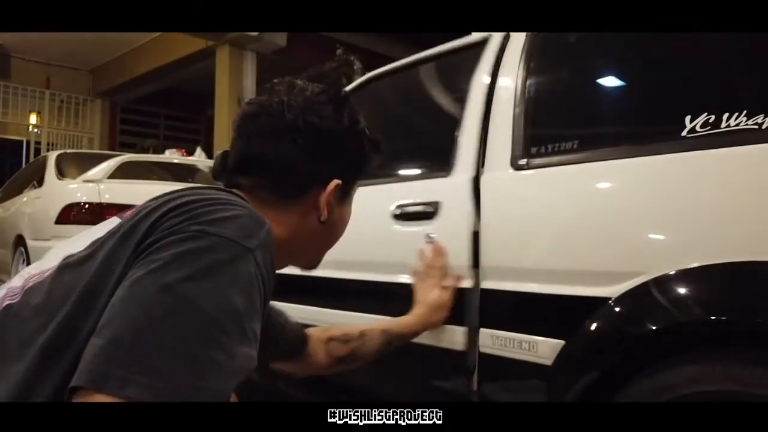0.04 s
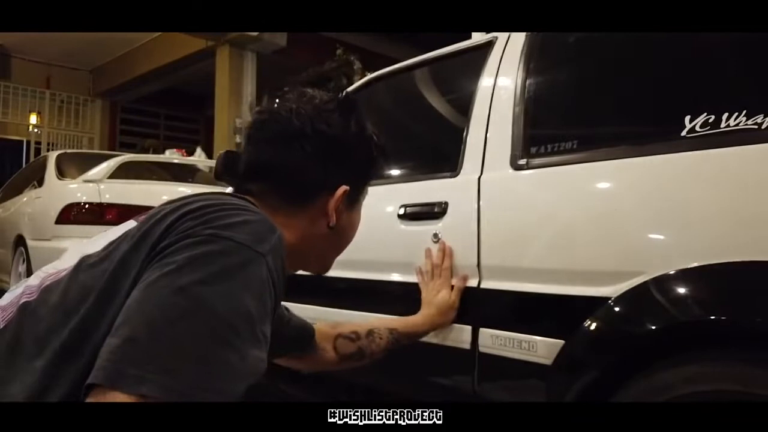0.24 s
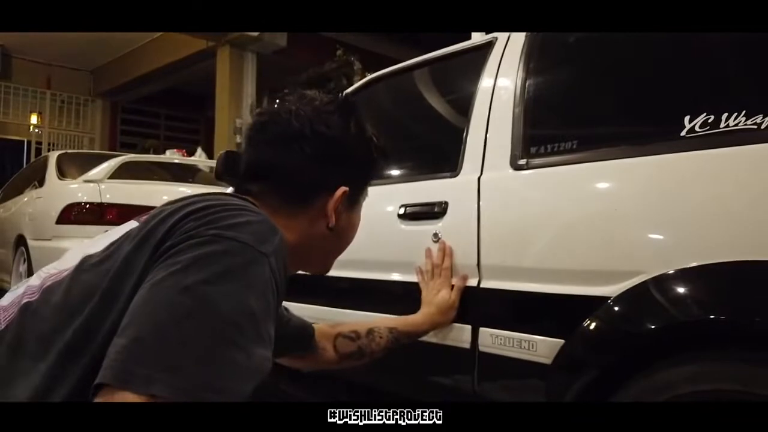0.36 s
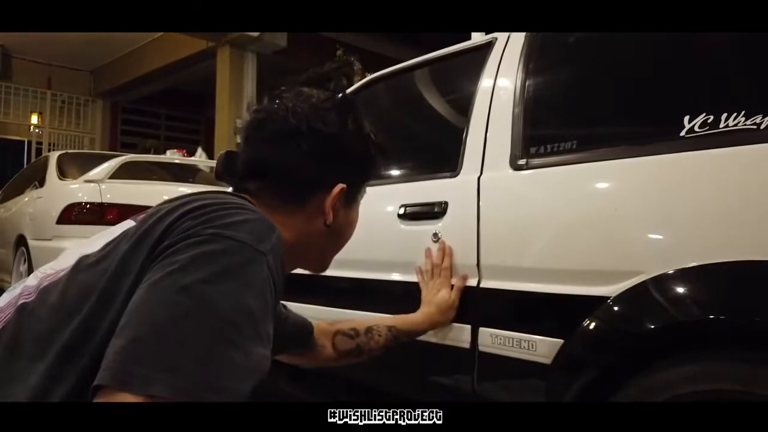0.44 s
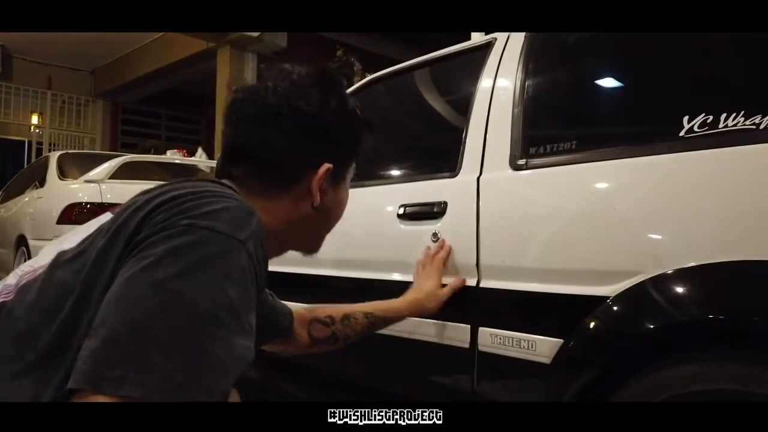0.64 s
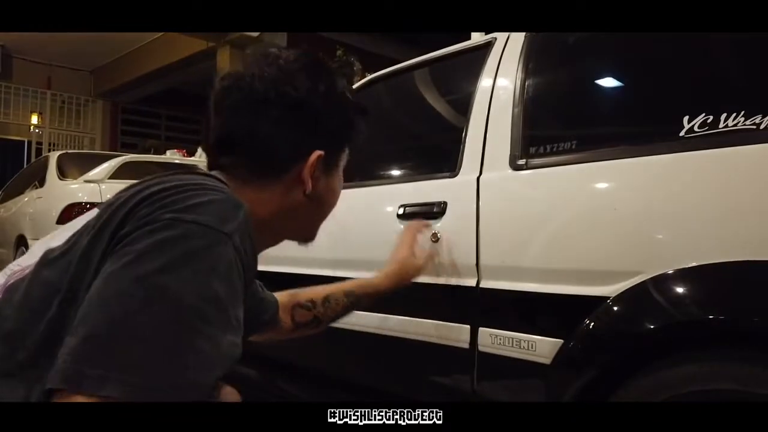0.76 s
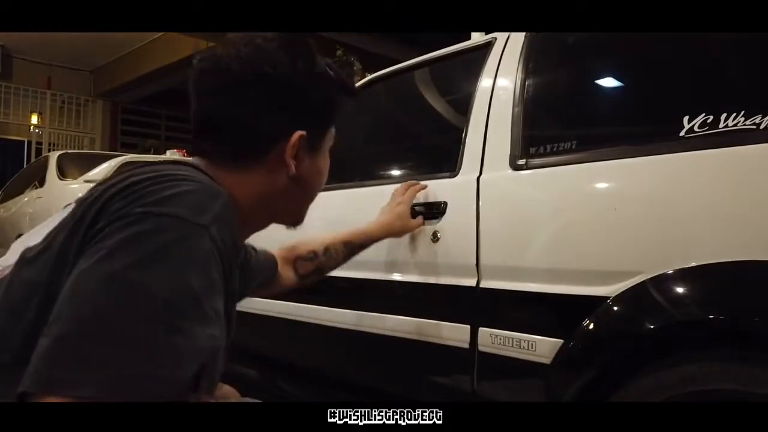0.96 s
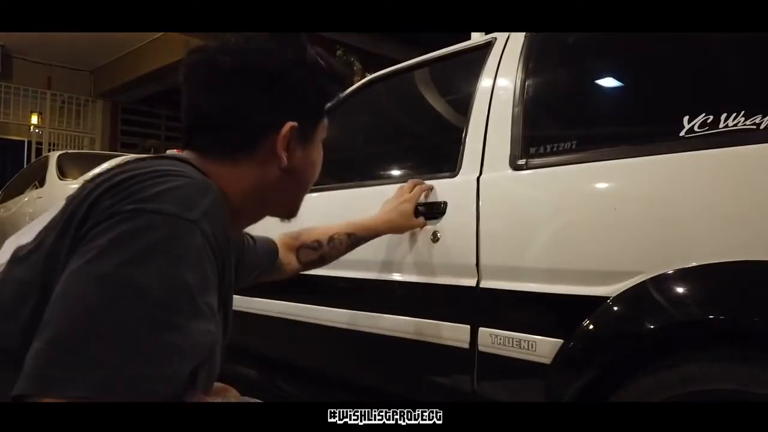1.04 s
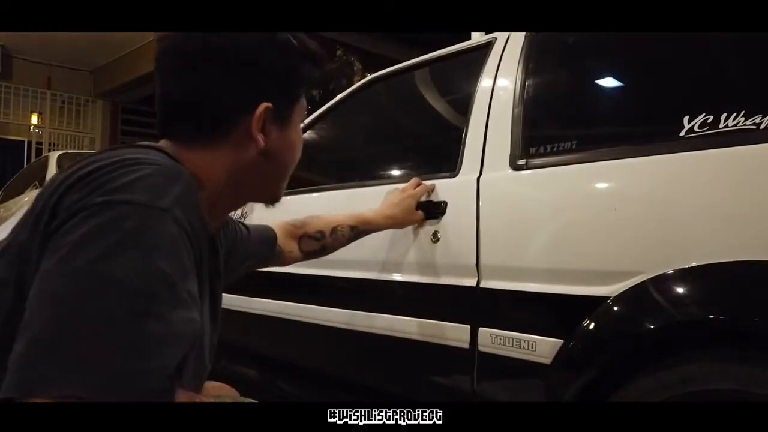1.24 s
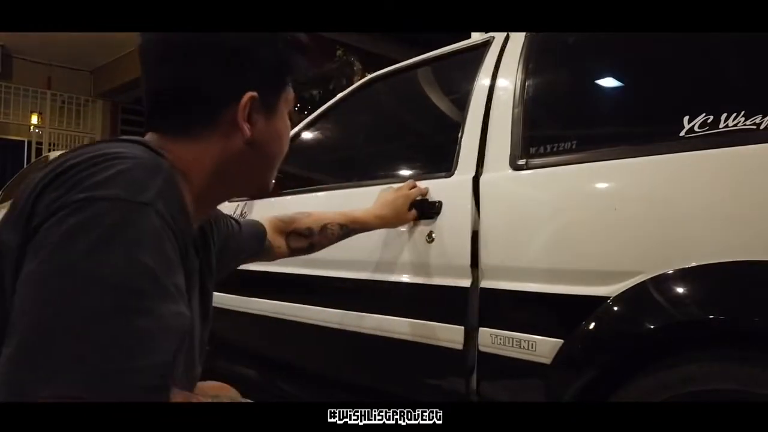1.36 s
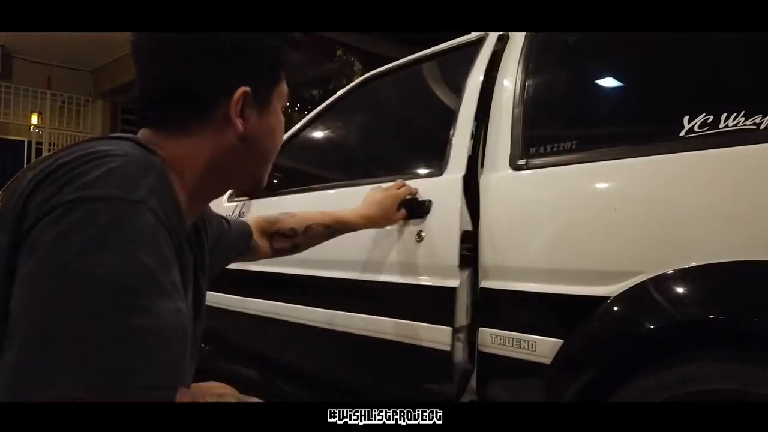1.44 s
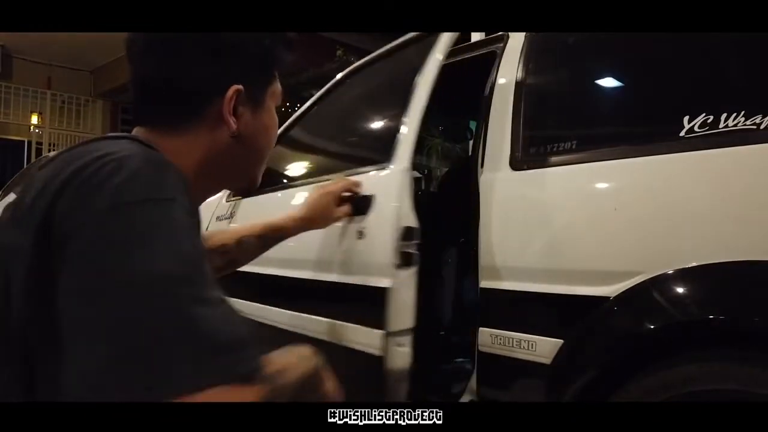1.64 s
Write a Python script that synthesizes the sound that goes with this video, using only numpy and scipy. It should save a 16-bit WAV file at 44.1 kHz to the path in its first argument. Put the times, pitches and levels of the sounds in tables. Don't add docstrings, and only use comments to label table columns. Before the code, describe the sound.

Close phone pickup of a vehicle door banging shut, boomy and metallic, with a quick wall echo, faint hand rubs and panel taps, then a crisp multi-click latch opening over quiet insects and traffic rumble.

```python
import sys
import numpy as np
from scipy import signal
from scipy.fft import rfft, irfft, next_fast_len
from scipy.io import wavfile

SR = 44100
rng = np.random.default_rng(int(sys.argv[2]) if len(sys.argv) > 2 else 0)


def unload_wav(signal):
    wavfile.write(
        sys.argv[1],
        SR,
        np.round(np.clip(np.atleast_2d(signal).T, -1, 1) * 32767).astype(np.int16),
    )


def magnitude_from_level(level_db):
    exponent = np.asarray(level_db, float) / 20
    return 10 ** exponent


N = 74970


def on_log(table, hz):
    a = np.array(table, float)
    return np.interp(np.log(np.maximum(hz, 1)), np.log(a[:, 0]), a[:, 1])


def unit(x):
    return x / np.sqrt(np.mean(x ** 2))


def shape(x, gain):
    n = next_fast_len(N + 4096)
    return irfft(rfft(x, n) * gain(np.arange(n // 2 + 1) * SR / n), n)[..., :N]


def bell(hz, width_hz):
    return lambda f: np.exp(-((f - hz) / width_hz) ** 2)


def swell(at, rise, t60):
    u = np.maximum(np.arange(N) / SR - at, 0)
    attack = np.sin(np.minimum(u / rise, 1) * np.pi / 2) ** 2
    return attack * np.exp(-np.log(1000) * np.maximum(u - rise, 0) / t60)


def walk(rate):
    return unit(shape(rng.standard_normal(N), bell(0, rate)))


def spread(x, direct=0, narrow_db=-2.0):
    # (frequency [Hz], level [dB])
    side_width = [(60, -51), (110, -55), (200, -21), (380, -12.5), (700, -5.5), (1290, -2), (2380, 6),
                  (4400, 3.5), (8120, 7.5), (15000, 7.5)]
    scatter = rng.standard_normal(N) * swell(0, 0.00069, 0.06)
    scatter = scatter / np.linalg.norm(scatter)
    wide = x - (1 - magnitude_from_level(narrow_db)) * direct
    side = signal.fftconvolve(wide, scatter)[:N] * walk(120) * 0.34
    side = shape(side, lambda f: magnitude_from_level(on_log(side_width, f)) * np.minimum(f / 300, 1) ** 3)
    bass_sway = shape(x, bell(0, 120)) * magnitude_from_level(-31.5) * walk(33)
    side = side + shape(bass_sway, bell(0, 200))
    return np.array([x + side, x - side])


def clatter(bursts, colour, scatter_db=1.5, ring_db=-8.0, count=45):
    panel_hz = [640, 641, 733, 740, 852, 946, 1097, 1320, 1392, 1755, 2100, 2614]
    treble_hz = 4100
    uneven = magnitude_from_level(scatter_db * rng.exponential(size=N)) * magnitude_from_level(0.5 * walk(190))
    hits = unit(rng.standard_normal(N) * uneven)
    body = hits * sum(magnitude_from_level(db) * swell(at, rise, t60) for at, db, rise, t60, _ in bursts)
    edge = hits * sum(magnitude_from_level(db + treble_db) * swell(at, rise, t60) for at, db, rise, t60, treble_db in bursts)
    hits = edge + shape(body - edge, bell(0, treble_hz))

    def damp(f):
        return 50 + f / 23.0

    def gain(f):
        low_end = np.minimum(f / colour[0][0], 1) ** 2
        high_end = np.minimum(colour[-1][0] / (f + 1), 1) ** 10
        return magnitude_from_level(on_log(colour, f)) * low_end * high_end

    u = np.arange(SR // 20) / SR
    modes_hz = np.r_[panel_hz, 1500 * 8. ** rng.random(count)]
    ring = sum(np.sin(2 * np.pi * f * u) * np.exp(-u * damp(f)) * np.sqrt(damp(f)) for f in modes_hz)
    ring = magnitude_from_level(ring_db) * ring / np.linalg.norm(ring) + (u == 0)
    loudness = np.sqrt(np.mean(gain(np.arange(SR // 2)) ** 2))
    return shape(signal.fftconvolve(hits, ring)[:N], gain) / loudness


def night():
    # (frequency [Hz], level [dB per Hz])
    traffic_colour = [(20, 8.5), (60, -2.5), (150, -9), (440, -23), (1500, -29), (5500, -38.5),
                      (11000, -62), (12800, -70)]
    # (pitch [Hz], width [Hz], level [dB])
    insects = [
        (3615, 31, -64.5),
        (4450, 910, -52.5),
        (9090, 1560, -56.5),
        (9500, 4600, -63),
    ]
    traffic_db = -43.5
    traffic, surge = 0, walk(2.4)
    for hz in 25 * 2 ** np.arange(0, 9.1, .5):
        sway_db = 0.8 * surge + 1.5 * walk(6)
        traffic = traffic + shape(rng.standard_normal(N), bell(hz, hz / 4)) * magnitude_from_level(sway_db)
    traffic = shape(traffic, lambda f: magnitude_from_level(on_log(traffic_colour, f)))
    bugs = 0
    for hz, width_hz, db in insects:
        choir = unit(shape(rng.standard_normal((2, N)), bell(hz, width_hz / 2)))
        bugs = bugs + choir * magnitude_from_level(db + 1.05 * walk(25))
    bugs = 0.44 * bugs[0] + 0.43 * bugs[1] * np.array([[1], [-1]])
    return spread(unit(traffic) * magnitude_from_level(traffic_db)) + bugs


def distant_tail():
    # (time [s], level [dB], rise [s], t60 [s], extra treble [dB])
    returns = [
        (.6000, -61.5, 0.043, 0.99, 0),
        (.7400, -64, .012, 0.26, 5),
        (.8360, -74, .001, 0.11, -5),
    ]
    # (frequency [Hz], level [dB per Hz])
    colour = [(1300, -23), (1800, 3.5), (2150, 6), (2600, -18), (3300, -18)]
    return clatter(returns, colour, scatter_db=-1.0, ring_db=-16.0)


def wall_echo():
    # (time [s], level [dB], rise [s], t60 [s], extra treble [dB])
    echoes = [
        (.4985, -41.5, 0.0017, 0.27, 1.5),
        (.5120, -47.5, 0.015, 0.2, -1.5),
        (.5800, -60.5, 0.019, 0.55, -0.5),
    ]
    # (frequency [Hz], level [dB per Hz])
    colour = [(500, -6), (1500, -2.5), (2200, 3), (3300, 2), (4500, -11.5), (7000, -10), (11000, -15),
              (15000, -22)]
    return clatter(echoes, colour, scatter_db=-0.5, ring_db=-22.0)


def carport(x):
    # (frequency [Hz], t60 [s])
    decay = [(60, 0.94), (300, 0.8), (1500, 0.48), (5000, 0.87), (10000, 0.57), (15000, 0.29)]
    port_db = -16
    tail = 0
    for hz in 30 * 2. ** np.arange(10):
        octave = shape(rng.standard_normal(N), bell(hz, hz / 2))
        tail = tail + octave * swell(0, 0.0098, on_log(decay, hz))
    return signal.fftconvolve(x, magnitude_from_level(port_db) * tail / np.linalg.norm(tail))[:N]


def grip():
    # (time [s], level [dB], rise [s], t60 [s], extra treble [dB])
    rubs = [
        (.1050, -61.5, 0.0098, 0.21, -8),
        (.4900, -49.5, .03, .5, -6),
        (.7250, -53.5, 0.013, 0.27, -3),
        (1.1700, -61, 0.015, 0.079, 4),
        (1.3300, -53, 0.026, 0.48, -7),
        (1.3900, -53, 0.033, 0.14, -5),
    ]
    # (frequency [Hz], level [dB per Hz])
    colour = [(150, -2), (300, -11.5), (600, -29), (2000, -25.5)]
    return clatter(rubs, colour)


def finger_taps():
    # (time [s], level [dB], rise [s], t60 [s], extra treble [dB])
    taps = [
        (.0960, -64.5, 0.022, 0.06, -9),
        (.7270, -48.5, 0.0015, 0.064, -5),
        (.8362, -52, .0004, 0.047, 1),
        (.8480, -61, 0.0086, 0.17, 6),
    ]
    # (frequency [Hz], level [dB per Hz])
    colour = [(500, -11), (800, 7), (1500, -1.5), (2600, -0.5), (3500, -15), (6000, -40)]
    return clatter(taps, colour)


def latch_opening():
    # (time [s], level [dB], rise [s], t60 [s], extra treble [dB])
    clicks = [(1.3420, -58, 0.003, 0.1, -3), (1.3745, -58, 0.002, 0.088, -6),
              (1.4190, -48, 0.021, 0.27, -1.5), (1.4430, -38, 0.0015, 0.16, -1),
              (1.4515, -33.5, 0.0013, 0.034, 11.5), (1.4725, -27.5, 0.0015, 0.027, -0.5),
              (1.4800, -37.5, 0.011, 0.25, -7), (1.4645, -41, .0008, 0.022, 0.5),
              (1.4875, -39, .0006, 0.013, -2), (1.5015, -35.5, 0.00093, 0.026, 3.5),
              (1.5200, -48.5, 0.0082, 0.16, 1), (1.5790, -51, 0.0024, 0.049, -22),
              (1.6700, -68, 0.0091, 0.34, 3)]
    # (frequency [Hz], level [dB per Hz])
    colour = [(300, -8.5), (560, -8), (900, -1.5), (2500, -1.5), (4200, -9), (8000, -12), (11000, -12.5),
              (15000, -26.5)]
    return clatter(clicks, colour, scatter_db=1.0)


def metal_pings():
    # (time [s], pitch [Hz], level [dB], rise [s], t60 [s])
    tones = [(0.087, 1590, -48.5, 0.021, 0.085), (0.21, 790, -21, 0.0029, 0.066),
             (0.215, 945, -23, 0.0016, 0.059), (0.22, 1440, -21, 0.0024, 0.056),
             (.2890, 7070, -21.5, 0.00067, .015), (0.1, 570, -59, .015, 0.18),
             (0.21, 630, -32, 0.0036, .035), (.2250, 1250, -22.5, 0.0025, .03),
             (0.23, 2150, -26, 0.0065, .05), (0.28, 600, -18, .003, 0.061), (0.28, 2050, -28, 0.0049, .06),
             (.3150, 237, -27, 0.0224, 0.162), (.3050, 323, -28.5, 0.014, 0.18),
             (.3500, 598, -41, .02, 0.2), (0.37, 178, -34.5, 0.023, 0.44), (.4700, 192, -49, 0.025, .4),
             (0.74, 616, -47, 0.0028, 0.053), (0.728, 930, -49, 0.0024, 0.077),
             (0.837, 694, -54.5, 0.0019, 0.2), (0.850, 950, -48, .01, 0.09), (.8365, 840, -50, .001, .05),
             (1.27, 1760, -56.5, 0.012, 0.15), (1.342, 1350, -54.5, .004, 0.033),
             (1.346, 1780, -54, 0.0048, .04), (1.338, 1530, -51, 0.0064, 0.027),
             (1.415, 665, -46, 0.003, 0.056), (1.4510, 900, -26, 0.0042, 0.029),
             (1.441, 420, -38.5, 0.022, 0.17), (1.5015, 1320, -38, 0.00091, .03),
             (1.455, 1800, -38, .003, .05), (1.4730, 950, -25, 0.00062, 0.026),
             (1.481, 2100, -35, .0015, 0.018), (1.451, 2600, -30.5, 0.0017, 0.099),
             (1.454, 10560, -29.5, 0.0014, 0.014), (.2480, 280, -32, .006, 0.11),
             (.3800, 100, -30, 0.011, .15), (0.584, 84, -46, 0.073, 1.7), (0.76, 1750, -55, .001, .08),
             (0.77, 2800, -61, 0.0091, .05), (1.3745, 3300, -56, .003, .035),
             (1.4760, 680, -35, 0.0033, 0.072), (1.477, 1500, -35, 0.0059, 0.042),
             (1.501, 4920, -28, 0.0018, 0.039), (1.498, 10580, -35, 0.0041, 0.014)]
    t = np.arange(N) / SR
    waver = magnitude_from_level(2.5 * walk(60))
    return waver * sum(magnitude_from_level(db) * swell(at, hold, t60) * np.sin(2 * np.pi * hz * t)
                       for at, hz, db, hold, t60 in tones)


def slam_rattle():
    # (time [s], level [dB], rise [s], t60 [s], extra treble [dB])
    rattles = [
        (.1900, -64, 0.038, 0.038, 27),
        (.2128, -28.5, 0.00082, 0.26, 6),
        (.2250, -31, 0.019, 0.31, -8.5),
        (.2450, -27, 0.023, 0.25, 0),
        (.2620, -29.5, 0.027, 0.053, -5),
        (.2860, -24, 0.0026, 0.066, -26),
        (.3000, -34.5, 0.0089, 0.63, -9),
    ]
    # (frequency [Hz], level [dB per Hz])
    colour = [(400, -2.5), (800, -2.5), (1400, -5.5), (3000, -10), (5000, -12.5), (9000, -18), (11000, -14),
              (15000, -20)]
    return clatter(rattles, colour)


def thump():
    # (time [s], level [dB], contact [ms], signed strength [ratio])
    blows = [(0.2280, -8, 7.6, 0.51), (0.2343, -9, 6.03, -1.5), (0.249, -12, 19, 1),
             (0.265, -7, 6.9, -0.92), (0.273, -9, 4.5, 1), (0.283, 9, 4.6, -0.186),
             (0.332, -22.5, 3.7, 0.79), (1.342, -49.5, 2.6, 1), (1.373, -45.5, 3.3, 1),
             (1.425, -35, 3.6, -0.8), (1.449, -41, 5.3, 1)]
    # (frequency [Hz], level [dB], t60 [s])
    body_modes = [(28.4, 8, 0.14), (39, -6, 0.034), (49.8, 2, 0.19), (32.64, -18, 2.4), (46.4, -21, 1.91),
                  (85, -11, 0.1), (96.2, 3, 0.33), (87.5, -6.5, 1.1), (58.2, -14.5, 0.32), (114, -6, 0.61),
                  (138.3, -3.5, 0.256), (183, 4.5, 0.2), (245.7, 0, 0.16), (323, -37.5, 0.14)]
    t = np.arange(N) / SR
    push = 0
    for at, db, ms, way in blows:
        contact = np.exp(-((t - at) / (ms / 4000)) ** 2) / (ms * SR / 2000)
        push = push + way * magnitude_from_level(db) * contact
    shudder = shape(rng.standard_normal(N), bell(0, 106)) * swell(0.26, 0.04, 1.76)
    push = push + magnitude_from_level(-61) * shudder
    modes = sum(magnitude_from_level(db) * np.sin(2 * np.pi * hz * t) * np.exp(-np.log(1000) * t / t60)
                for hz, db, t60 in body_modes)
    return signal.fftconvolve(push, modes)[:N] * 0.45


def scene():
    metal = slam_rattle() + latch_opening() + finger_taps() + metal_pings()
    door = metal + carport(metal) + wall_echo() + thump() + grip()
    near = spread(magnitude_from_level(6.5) * door, magnitude_from_level(5.5) * metal)
    far = spread(magnitude_from_level(5.0) * distant_tail())
    return night() + far + near


def low_pass(x):
    return signal.sosfilt(signal.butter(12, 16960, fs=SR, output="sos"), x)


def record(dry):
    mic_low_hz, mic_top_hz, top_cut_db = 18.7, 15900, -24
    duck_db, duck_at_s, attack_s, release_s = -12, 0.19, 0.029, 7.7
    u = np.maximum(np.arange(N) / SR - duck_at_s, 0)
    gain = magnitude_from_level(duck_db * (1 - np.exp(-u / attack_s)) * np.exp(-u / release_s))
    dry = signal.sosfilt(signal.butter(2, mic_low_hz, 'high', fs=SR, output='sos'), dry)
    dry = shape(dry, lambda f: magnitude_from_level(top_cut_db * np.clip((f - mic_top_hz) / 150, 0, 1)))
    mix = np.tanh(dry * gain * 0.68) / 0.52
    return low_pass(mix)


dry = scene()
out = record(dry)
unload_wav(out)
```